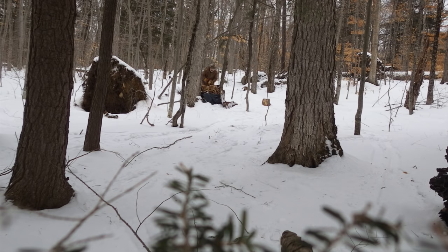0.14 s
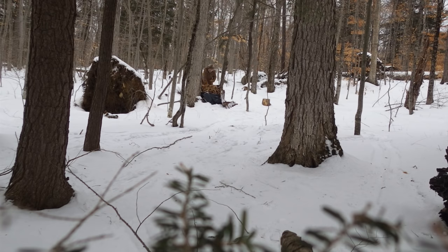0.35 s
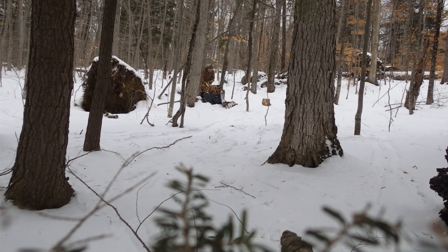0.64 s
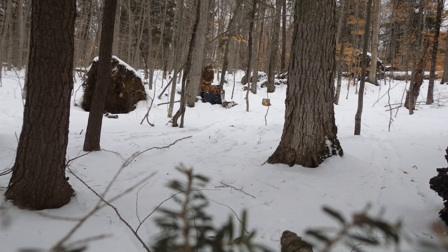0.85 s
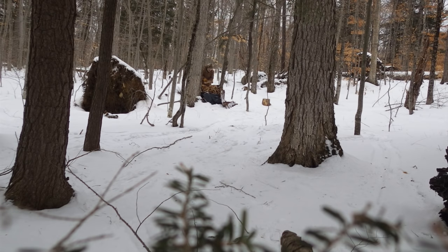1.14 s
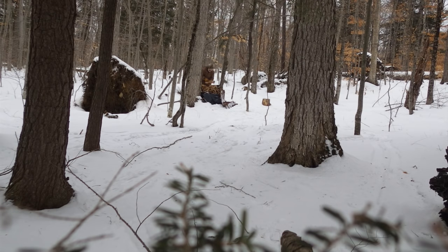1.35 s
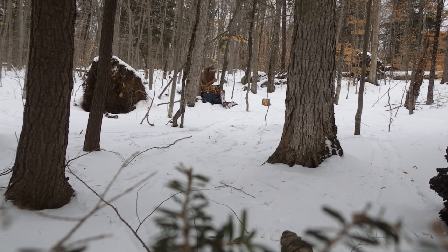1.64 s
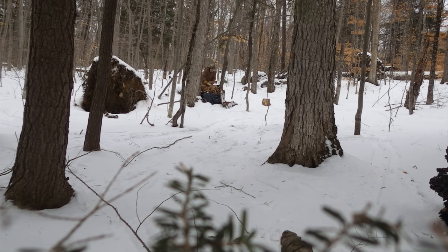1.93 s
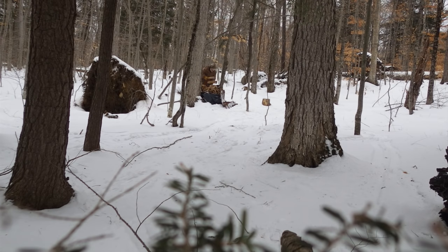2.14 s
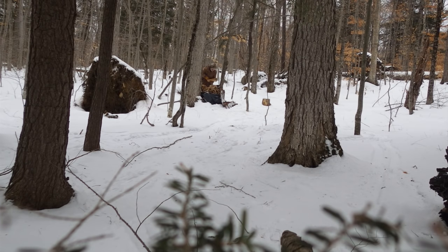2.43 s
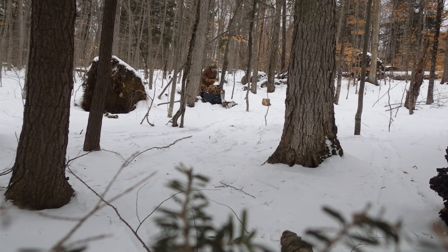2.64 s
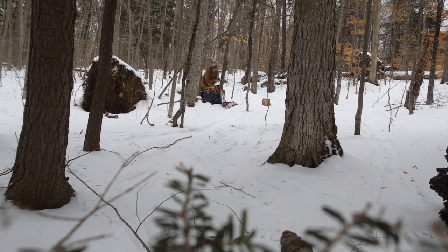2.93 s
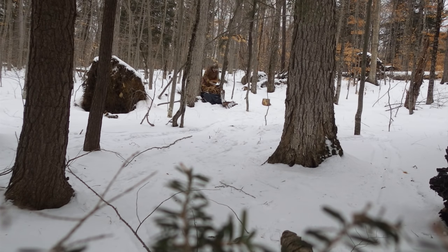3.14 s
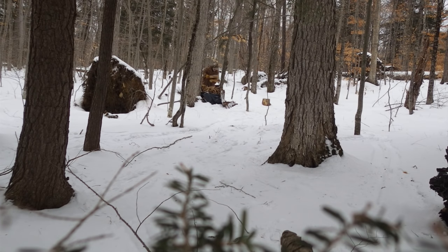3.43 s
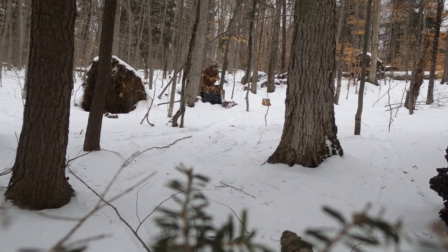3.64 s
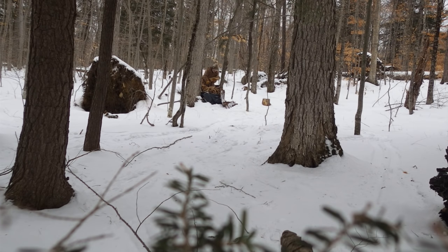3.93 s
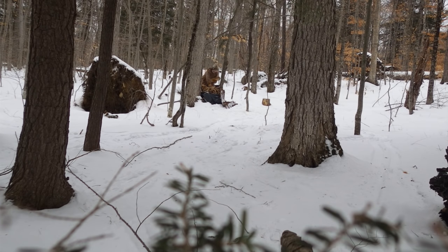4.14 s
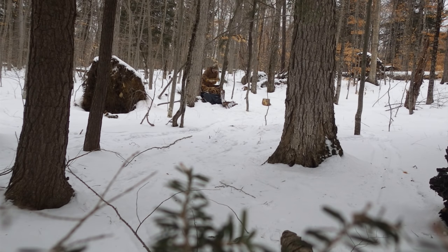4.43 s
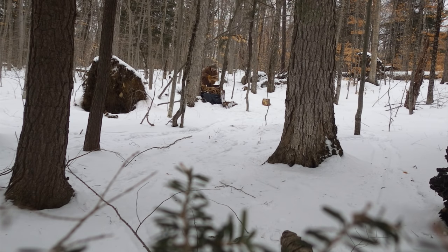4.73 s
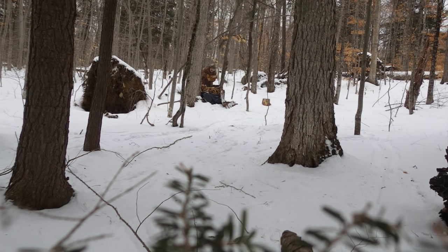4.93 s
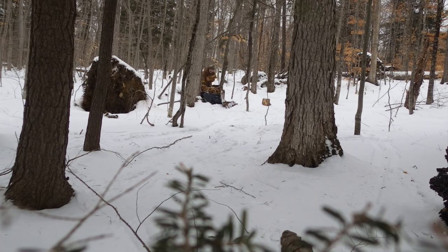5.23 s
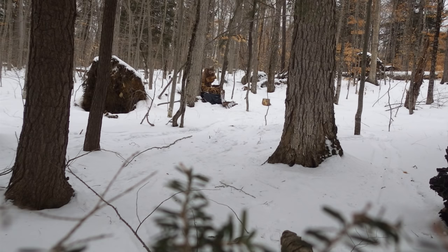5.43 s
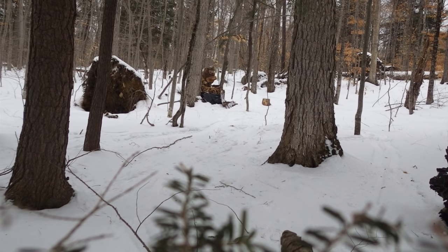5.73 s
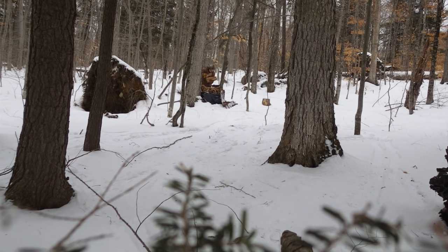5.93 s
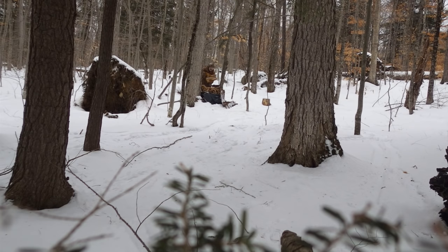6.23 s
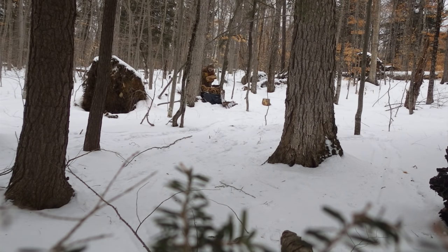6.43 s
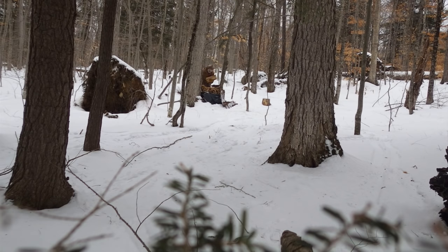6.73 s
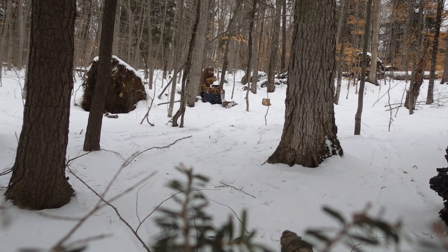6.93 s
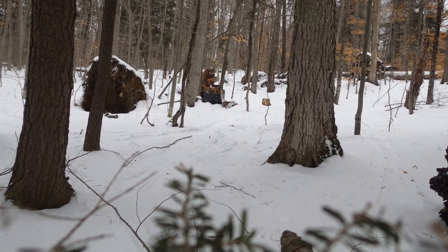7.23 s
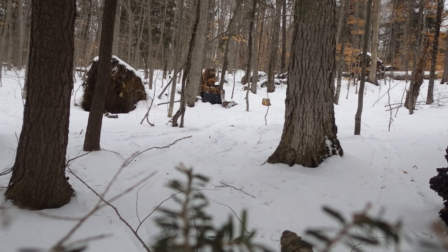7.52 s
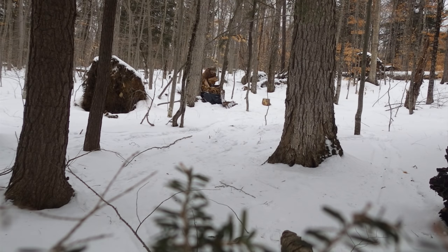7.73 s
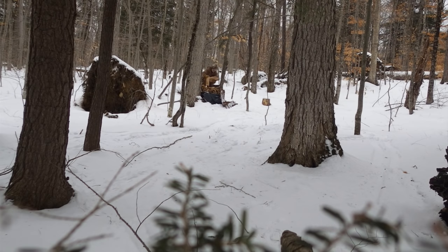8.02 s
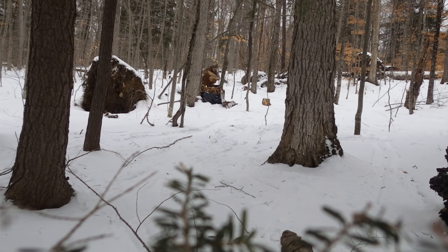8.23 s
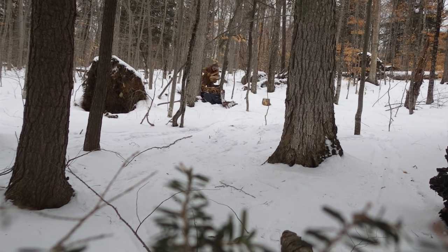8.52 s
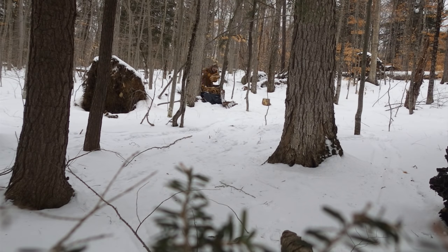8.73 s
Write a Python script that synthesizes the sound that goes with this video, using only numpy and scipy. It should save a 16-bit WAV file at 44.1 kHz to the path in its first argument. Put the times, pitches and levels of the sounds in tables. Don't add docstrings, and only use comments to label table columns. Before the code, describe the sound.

In a quiet snowy wood, split logs are handled and stacked about twenty metres away. After light taps, a hard clunk near the start stands out as the loudest, followed by irregular knocks, corner ticks and short bark scrapes. Trunks return a thin, dry echo and a faint bird whistles now and then. A camera microphone adds steady soft hiss and dulled treble.

```python
import sys
import numpy as np
from scipy import signal
from scipy.fft import rfft, irfft, next_fast_len
from scipy.io import wavfile
from scipy.ndimage import uniform_filter1d

SR = 44100
rng = np.random.default_rng(int(sys.argv[2]) if len(sys.argv) > 2 else 0)


def boost_factor(decibels):
    exponent = np.asarray(decibels, float) / 20
    return 10 ** exponent


def master(y):
    cut = np.clip(np.atleast_2d(y).T, -1, 1)
    pcm = np.round(cut * 32767)
    wavfile.write(sys.argv[1], SR, pcm.astype(np.int16))


N = 391166
TIME = np.arange(int(.16 * SR)) / SR

# start_s, length_s, body_db, grit_db
SCRAPES = [(.75, .05, -51, -65), (0.822, .13, -59, -62.5), (1.146, 0.028, -48, -64.5), (1.8, .4, -75, -69),
           (1.93, .05, -61, -63.5), (2.048, 0.016, -52.5, -63), (2.618, 0.051, -51.5, -60.5),
           (2.756, 0.023, -53.5, -63.5), (2.8, 0.045, -64, -69), (3.058, .26, -61, -70),
           (3.87, 0.11, -55, -59), (3.99, .04, -50, -57), (4.031, 0.087, -60, -61.5),
           (4.333, 0.028, -55, -60), (4.407, .14, -62, -67), (4.795, .2, -68, -73),
           (5.017, 0.033, -44.5, -64.5), (5.077, .15, -54.5, -65.5), (5.762, .17, -52.5, -58),
           (5.96, 0.13, -56.5, -61.5), (6.1, .2, -72, -68), (6.51, .015, -58, -50),
           (6.531, 0.022, -41, -57), (6.62, 0.11, -59, -66), (7.598, 0.11, -56, -65),
           (7.69, 0.33, -59, -67), (8.1, 0.11, -55.5, -62), (8.765, .02, -56, -67), (8.81, .05, -50, -64)]
# freq_hz, level_db
WOOD = [(120, -36.5), (200, -30.5), (610, -13), (736, -6), (995, -7), (1450, -6), (1800, -8.5), (2060, -26),
        (2420, -17.5), (4000, -26.5), (5200, -57), (8800, -120)]
# freq_hz, level_db
FIBRES = [(1500, -23), (2400, -5), (3600, -9.5), (4500, 0), (6400, 0.5), (7600, -21), (11000, -31)]
# tone_hz, level_db, t60_s
FIRST_LOG = [(284, -15, .04), (749, -3, 0.16), (980, -8, 0.05), (1179, 3, 0.025), (1230, -8, .16),
             (1390, -6.5, 0.049), (1920, -4, 0.032), (2300, -9, 0.06), (2850, -14, .04)]
BIG_LOG = [(360, -39, 0.027), (515, -27, 0.054), (788.5, -14, .09), (980, -22, .08), (1170, -18, .05),
           (1345, 0, .03), (1400, 2.5, 0.033), (1847, -25, 0.068), (2400, -29, 0.06), (2907, -27, 0.05)]
ROLLING_LOG = [(773, -4.5, 0.13), (945, 1, 0.04), (1280, 5, 0.027), (1790, -15, 0.096), (2900, -20, 0.044)]
ROLLING_END = [(767, -6, 0.085), (960, -6, 0.049), (1095, 1.5, 0.035), (1830, -7.5, .05),
               (2910, -14.5, 0.053)]
THIN_SPLIT = [(837, -10.5, 0.056), (1360, -6.5, 0.041), (1590, 8, 0.035), (2230, -30, 0.075)]
SHORT_SPLIT = [(1067, -26.5, 0.075), (1435, -1.5, 0.017), (1542, 6.5, 0.009), (1840, -33, 0.066),
               (2440, -39, 0.04)]
DEAD_STICK = [(300, -11, 0.016), (620, 2, 0.011), (1050, -6, 0.019), (2400, -9, 0.015),
              (2890, -11.5, 0.014)]
DRY_STICK = [(1380, -0.5, 0.15), (1940, -8, 0.0666), (2396, -19.5, 0.086)]
THICK_LOG = [(457, -2.5, 0.057), (760, 12.5, 0.041), (910, -4.5, 0.13), (1300, -4.5, 0.081),
             (1800, -31, 0.034)]
MIDDLE_LOG = [(750, -7.5, 0.034), (980, 1, 0.028), (1360, 2.5, 0.028), (1800, -35, 0.035),
              (2330, -27, 0.053)]
HOLLOW_LOG = [(504, -12, 0.13), (766, -5.5, 0.087), (980, 3.5, 0.18), (1270, -2, 0.057), (1834, -2, 0.036),
              (2840, -7, 0.035), (382, -10.5, 0.085)]
KNOTTY_LOG = [(526, -3.5, 0.038), (714, -4, 0.064), (990, -14.5, 0.033), (1390, -6, 0.049),
              (1760, -15.5, .04), (2960, -15.5, 0.036)]
LIGHT_SPLIT = [(915, 3, 0.053), (1450, 2, 0.15), (1930, 0, 0.0485)]
LOW_LOG = [(261, -5, 0.11), (793, 0, 0.084), (1080, -0.5, 0.068), (1370, 2.5, 0.069), (1800, -8, 0.061)]
LAST_LOG = [(737, -6.5, 0.049), (990, 12.5, 0.0093), (1335, -12, 0.12), (2200, -19, 0.038),
            (2860, -3, 0.025)]
LAST_END = [(556, -2.5, 0.13), (1360, -22, 0.1), (1810, 13, 0.026), (2580, -1.5, 0.042)]


def colour(x, points):
    hz, db = np.transpose(points)
    size = next_fast_len(len(x))
    f_hz = np.maximum(np.arange(size // 2 + 1) * SR / size, 1)
    gain = boost_factor(np.interp(np.log(f_hz), np.log(hz), db))
    y = irfft(rfft(x, size) * gain, size)[:len(x)]
    return y / np.sqrt(np.mean(y ** 2))


def band(x, lo_hz, hi_hz):
    return signal.sosfilt(signal.butter(2, [lo_hz, hi_hz], "bandpass", fs=SR, output="sos"), x)


def add(out, x, start_s):
    i = int(start_s * SR)
    out[i:i + len(x)] += x[:len(out) - i]


def knock(modes, noise, peak_db, crack_db, contact_ms, splinter, thud_db):
    rattle_t60_s, crack_t60_s = .045, .026
    thud_hz, thud_t60_s = 318, 0.0063
    swell = 1 - np.exp(-(TIME * 1000 / max(contact_ms, .2)) ** 2)

    hz, db, t60_s = np.transpose(modes)[:, :, None]
    decay = boost_factor(db - 60 * TIME / np.clip(t60_s, .01, .16))
    ring = (decay * np.sin(2 * np.pi * hz * TIME)).sum(axis=0) * swell

    noise_t60_s = np.minimum([[rattle_t60_s], [crack_t60_s]], t60_s.max())
    rattle, crack = noise * swell * boost_factor(-60 * TIME / noise_t60_s)
    body = ring / np.abs(ring).max() + np.clip(splinter, 0, 1.5) * rattle
    thud = np.sin(2 * np.pi * thud_hz * TIME) * boost_factor(-60 * TIME / thud_t60_s) * swell

    hit = body / np.abs(body).max()
    hit = hit + boost_factor(crack_db) * crack / np.abs(crack).max()
    hit = hit + boost_factor(thud_db) * thud / thud.max()
    return boost_factor(peak_db) * hit


def logs():
    # log, peak_s, peak_db, crack_db, contact_ms, splinter_0_to_1
    heavy_blows = [(FIRST_LOG, 1.138, -21.5, -14, 1.1, 0.25), (BIG_LOG, 1.387, -5.7, -24, 2.7, 0.35),
                   (DEAD_STICK, 1.395, -34, 1, 2.5, .5), (ROLLING_LOG, 2.598, -23, -14, 1.6, 0.15),
                   (ROLLING_END, 2.632, -31, -10, 1.3, 0.4), (ROLLING_END, 2.655, -31, -0.5, 1.9, 0.6),
                   (THIN_SPLIT, 3.872, -27.5, -14, 1.8, 0.6), (SHORT_SPLIT, 3.9865, -21, -11, 1.5, 0.22),
                   (DEAD_STICK, 4.3717, -30, -1, .9, 0.25), (DRY_STICK, 4.494, -36, -19, 8, 0.02),
                   (THICK_LOG, 5.038, -20, -25, 2.2, 0.28), (MIDDLE_LOG, 5.211, -22, -32, 1.1, 0.4),
                   (HOLLOW_LOG, 6.519, -21.5, -16, 1.5, 0.3), (LAST_LOG, 6.525, -24, -14, 1.5, .3),
                   (THICK_LOG, 6.546, -33, -20, 2.2, 0.3), (HOLLOW_LOG, 6.576, -30.5, -20, 1.9, 0.3),
                   (KNOTTY_LOG, 6.616, -22, -8.5, 2.2, 0.5), (LIGHT_SPLIT, 7.907, -35, -10, 1.7, 0.7),
                   (MIDDLE_LOG, 7.9355, -32, -26, 1.9, 0.08), (LOW_LOG, 8.116, -30, -14.5, 2.7, 0.4),
                   (LAST_LOG, 8.789, -27, -6, 2.6, 0.7), (ROLLING_END, 8.794, -33, -20, 1.2, .4),
                   (MIDDLE_LOG, 8.802, -32, -22, 1.6, .4), (LAST_END, 8.822, -30.5, -27, 1.9, 0.7)]
    # peak_s, peak_db, mode_hz, crack_db
    thick_taps = [(0.642, -46, 826, -8.5), (0.745, -39, 1050, -10.5), (0.869, -54, 780, 2),
                  (2.681, -45, 822, -14), (2.786, -45, 1050, -3.5), (3.276, -44, 766, -8),
                  (3.938, -36.5, 915, -7), (4.019, -50, 931, -5), (4.059, -41, 760, -9),
                  (5.004, -35.5, 860, -12), (5.117, -33, 986, -18), (5.135, -42, 970, -11),
                  (5.231, -42.5, 943, -4.5), (5.874, -52, 780, 16.5), (6.017, -50, 869, -8),
                  (6.05, -33, 830, -17), (6.254, -50.5, 758, 11.5), (6.524, -19.5, 771, -12),
                  (6.531, -25, 954, -35.5), (6.549, -28, 980, -24), (6.639, -36, 765, -12.5),
                  (6.715, -41, 1003, -11), (6.925, -44.5, 660, -17), (6.949, -42.5, 630, -15),
                  (7.953, -41, 960, -18.5), (8.02, -42, 964, -14), (8.066, -42, 687, -16),
                  (8.839, -44.5, 960, -16.5)]
    # peak_s, peak_db, mode_hz, crack_db
    thin_taps = [(0.189, -42, 1080, -20), (0.717, -39, 1390, -22), (0.731, -37.5, 1370, -24),
                 (0.939, -48, 1070, -5), (1.098, -47.5, 1125, -18), (1.929, -43, 1400, -5),
                 (2.102, -38, 1310, -13.5), (2.751, -42, 1115, -18), (2.76, -41.5, 1460, -14),
                 (2.771, -47, 1320, -19.5), (3.052, -43.5, 1320, -16), (2.847, -43.5, 1390, -13.5),
                 (3.07, -45, 1250, -16.5), (3.096, -46.5, 1335, -13), (3.225, -43, 1360, -12.5),
                 (3.518, -47, 1217, -3), (4.331, -48, 1470, 1), (4.483, -43, 1800, -14),
                 (4.494, -39, 1380, -12), (5.221, -40, 1154, -1), (5.764, -42, 1337, 1),
                 (5.808, -49, 1220, 7.5), (6.04, -34.5, 1268, -24), (6.078, -45, 1260, -7),
                 (7.6, -43, 1020, -11.5), (7.652, -40, 1270, -6), (8.194, -45.5, 1345, -3)]
    # peak_s, peak_db, mode_hz, crack_db, t60_s
    ticks = [(.215, -47, 1400, -15, .05), (2.651, -35, 900, -25, .03), (2.657, -36, 1800, -20, .08),
             (2.636, -31, 1000, -8, .02), (3.881, -38, 1500, -15, .025), (3.893, -42, 800, -15, .025),
             (3.921, -42, 1210, -15, .03), (3.961, -36, 1500, -12, .015), (3.982, -38, 900, -10, .015),
             (4.005, -40, 1400, -15, .04), (5.006, -42, 420, -20, .04), (5.045, -44, 2500, -10, .04),
             (5.222, -40, 2400, -6, .03), (5.773, -43, 800, -10, .03), (5.798, -46, 1300, -6, .025),
             (5.829, -38, 1730, -16, .025), (5.846, -39, 1300, -12, .02), (5.851, -38, 900, -14, .03),
             (5.878, -49, 2400, -8, .05), (5.914, -42, 1050, -12, .03), (7.443, -49, 1020, -11, .015),
             (7.61, -45, 1300, -12, .02), (7.673, -34, 900, -18, .012), (7.675, -40, 1400, -18, .03),
             (7.72, -48, 330, -15, .03), (7.721, -46, 1100, -15, .02), (7.737, -50, 330, -15, .02),
             (7.766, -46, 1200, -11, .04), (7.803, -47, 1790, -12, .04), (7.873, -46, 1210, -10, .03),
             (7.902, -47, 2800, -10, .02), (8.113, -44, 1100, -20, .02), (8.123, -35, 1000, -20, .03),
             (8.13, -38, 760, -20, .05), (6.505, -44, 2700, -8, .08), (6.535, -27, 950, -25, .03),
             (6.598, -38, 950, -20, .04), (8.787, -38, 700, -20, .015), (8.812, -39, 1100, -20, .02),
             (8.818, -40, 900, -20, .015), (8.834, -36, 560, -25, .025), (8.847, -41, 1400, -15, .03)]
    blow_thud_db, tap_thud_db = -32.5, -27
    tap_t60_s, tap_contact_ms, tap_splinter = 0.05, 1.3, .42
    tick_contact_ms, tick_splinter = .8, .3
    tick_late_s = .0012

    hits = []
    for modes, s, *blow in heavy_blows:
        hits.append((s, modes, (*blow, blow_thud_db)))
    # (Hz, dB)
    for taps, answer in ((thick_taps, (1250, -5)), (thin_taps, (800, -10.5))):
        for s, peak_db, hz, crack_db in taps:
            modes = [(hz, 0, tap_t60_s), (*answer, tap_t60_s)]
            hits.append((s, modes, (peak_db, crack_db, tap_contact_ms, tap_splinter, tap_thud_db)))
    for s, peak_db, hz, crack_db, t60_s in ticks:
        tick = (peak_db, crack_db, tick_contact_ms, tick_splinter, tap_thud_db)
        hits.append((s + tick_late_s, [(hz, 0, t60_s)], tick))

    out = np.zeros(N)
    fibres = np.array([colour(rng.standard_normal(N + len(TIME)), points) for points in (WOOD, FIBRES)])
    for s, modes, hit in hits:
        near = int(round(s, 2) * SR)
        add(out, knock(modes, fibres[:, near:near + len(TIME)], *hit), s - .002)
    return out


def drags(levels_db, fall_db_s):
    rise_db_s = 706
    t = np.arange(0, N, 64)[:, None] / SR
    start_s, length_s = np.transpose(SCRAPES)[:2]
    rise_db = rise_db_s * np.maximum(start_s - t, 0)
    fall_db = fall_db_s * np.maximum(t - start_s - length_s, 0)
    db = levels_db - rise_db - fall_db
    return np.interp(np.arange(N) / SR, t[:, 0], boost_factor(db.max(axis=1)))


def bark():
    slips_per_s, burst_s = 600, .004
    slip_db = np.minimum(3 * rng.exponential(size=N), 7)
    slips = (rng.random(N) < slips_per_s / SR) * boost_factor(slip_db)
    bursts = signal.lfilter([1], [1, -np.exp(-1 / (burst_s * SR))], slips)
    body = colour(bursts * rng.standard_normal(N), WOOD)
    grit = colour((bursts + 1.1 * bursts.mean()) * rng.standard_normal(N), FIBRES)
    body_db, grit_db = np.transpose(SCRAPES)[2:]
    return drags(body_db, 171) * body + drags(grit_db, 243) * grit


def trunks(x):
    # lag_s, level_db
    near_trunks = [
        (.018, -29),
        (.038, -31),
        (.048, -31),
        (.074, -30),
        (.092, -28),
        (.140, -38),
        (.205, -38),
        (.327, -39),
    ]
    level_db, side_db, t60_s = -25.5, -20, 0.9
    t = np.arange(SR) / SR
    echoes = rng.standard_normal((2, SR)) * (rng.random((2, SR)) < .012 + .2 * t)
    echoes = band(echoes, 590, 3900) * boost_factor(-60 * t / t60_s) * np.minimum(t / 0.012, 1)
    echoes = echoes / np.sqrt((echoes ** 2).sum(axis=1, keepdims=True))
    mid, side = signal.fftconvolve(x[None], echoes, axes=1)[:, :N]

    near = np.zeros(N)
    dull = band(x, 600, 3200)
    for lag_s, db in near_trunks:
        add(near, boost_factor(db) * dull, lag_s)
    return near + boost_factor(level_db) * (mid + boost_factor(side_db) * side * np.array([[1], [-1]]))


def bird():
    # start_s, level_db, pitch_hz, length_s
    chirps = [
        (1.793, -54, 2400, 0.039),
        (3.827, -57, 2400, 0.039),
        (4.646, -52, 2400, 0.021),
        (6.269, -54, 2400, 0.055),
    ]
    out = np.zeros(N)
    for start_s, db, hz, length_s in chirps:
        t = np.arange(int(length_s * SR)) / SR
        flutter = 1 + .5 * np.cos(2 * np.pi * 70 * t)
        whistle = np.sin(2 * np.pi * hz * t * (1 + 0.053 * t))
        add(out, boost_factor(db) * np.hanning(len(t)) * flutter * whistle, start_s)
    return out


def hiss():
    # freq_hz, level_db
    mid_points = [(12, -38), (20, -19), (86, -7.5), (118, -2.5), (232, -1), (942, -6), (1300, -6.5),
                  (2060, -15.5), (2350, -9), (4140, -11.5), (5420, -7), (10600, -7), (12500, -8.5),
                  (16200, -56), (22000, -120)]
    # freq_hz, side_minus_mid_db
    side_points = [(60, 1), (110, -7), (200, -4.5), (350, -0.5), (640, 11), (1150, -6), (2080, -3),
                   (3760, 5.5), (6790, .3), (12300, 2)]
    hz, db = np.transpose(mid_points)
    side_hz, excess_db = np.transpose(side_points)
    side_db = db + np.interp(np.log(hz), np.log(side_hz), excess_db)
    mid = colour(rng.standard_normal(N), mid_points)
    side = colour(rng.standard_normal(N), np.c_[hz, side_db])
    return boost_factor(-54.5) * (mid + boost_factor(-6) * side * np.array([[1], [-1]]))


def scene():
    wood = logs() + bark() + bird()
    return wood * boost_factor(np.array([[-.2], [.2]])) + trunks(wood) + hiss()


def whine_notches(x):
    # centre_hz, width_hz, depth_db
    notches = [(1599, 120, -22), (2095, 76, -64), (3187, 317, -21.5), (4181, 440, -48.5),
               (7880, 160, -34.5)]
    for hz, width_hz, db in notches:
        w = 2 * np.pi * hz / SR
        a = np.sin(w) * width_hz / hz / 2
        zeros = [1 + a * boost_factor(db / 2), -2 * np.cos(w), 1 - a * boost_factor(db / 2)]
        poles = [1 + a, -2 * np.cos(w), 1 - a]
        x = signal.lfilter(zeros, poles, signal.lfilter(zeros, poles, x))
    return x


def camera_rounding(x):
    # freq_hz, step_db
    step_points = [(0, -22.5), (1200, -5.5), (2500, 5), (6000, 7), (12000, 6.5)]
    # freq_hz, step_db
    side_points = [(0, -1), (700, 1), (1100, 7), (1500, 11), (2000, 6), (2800, 5), (4500, 1), (12000, 1)]
    scatter_db = 2.5
    mid_side = np.array([x[0] + x[1], x[0] - x[1]]) / 2
    hz, _, spec = signal.stft(mid_side, SR, window="cosine", nperseg=2048)
    usual = uniform_filter1d(np.median(np.abs(spec[:, :, ::3]), axis=2), size=40, axis=1)
    bands = np.arange(len(hz)) // 12
    moods = rng.standard_normal((2, bands[-1] + 1, spec.shape[2]))[:, bands]

    side_extra_db = np.outer([0, 1], np.interp(hz, *np.transpose(side_points)))
    step_db = np.interp(hz, *np.transpose(step_points)) + side_extra_db
    step = (usual * boost_factor(step_db))[:, :, None] * boost_factor(scatter_db * moods) + 1e-12
    spec = step * np.round(spec / step)
    mid, side = signal.istft(spec, SR, window="cosine", nperseg=2048)[1][:, :N]
    return np.array([mid + side, mid - side])


def band_limit(x):
    return signal.sosfilt(signal.butter(12, 12860, fs=SR, output="sos"), x)


def record(dry):
    mix = camera_rounding(whine_notches(dry))
    top_cut = signal.ellip(9, .5, 46, 11850, fs=SR, output="sos")
    return band_limit(signal.sosfilt(top_cut, mix))


dry = scene()
out = record(dry)
master(out)
```